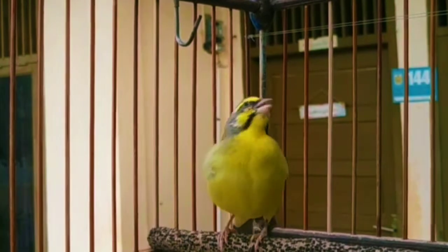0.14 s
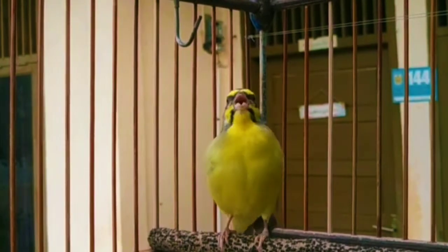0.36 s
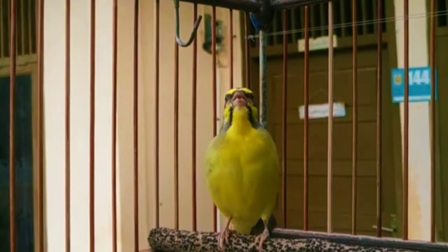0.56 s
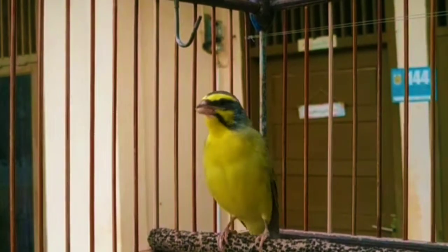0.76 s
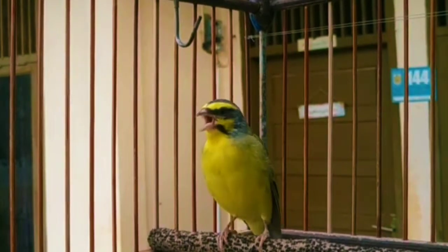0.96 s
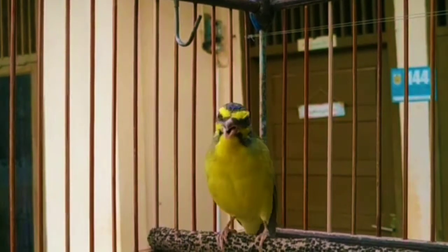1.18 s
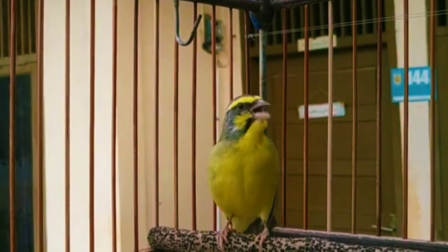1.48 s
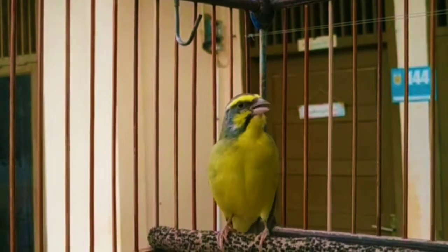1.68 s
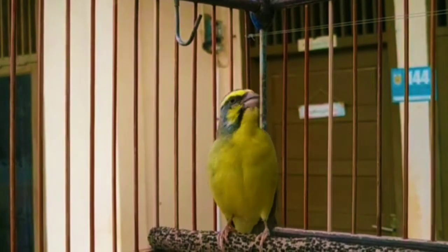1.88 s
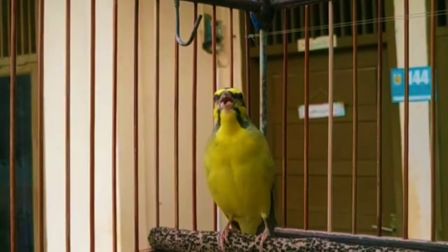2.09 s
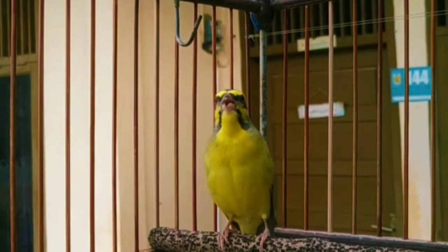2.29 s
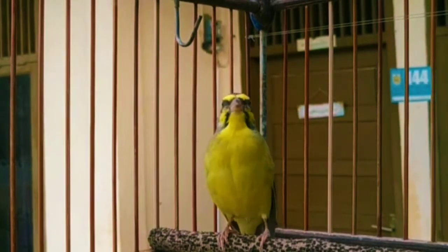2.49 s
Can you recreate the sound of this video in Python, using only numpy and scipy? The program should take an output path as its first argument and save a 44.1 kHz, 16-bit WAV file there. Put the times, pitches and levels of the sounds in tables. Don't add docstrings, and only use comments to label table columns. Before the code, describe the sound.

A caged canary sings a loud, fast burst of sweeping whistles ending in an even trill

```python
import sys
import numpy as np
from scipy import signal
from scipy.fft import rfft, irfft, next_fast_len
from scipy.io import wavfile
from scipy.ndimage import uniform_filter1d

SR = 44100
rng = np.random.default_rng(int(sys.argv[2]) if len(sys.argv) > 2 else 0)


def volts_from_decibels(level):
    exponent = np.asarray(level, float) / 20
    return 10 ** exponent


def generate_wav(signal):
    frames = np.transpose(np.atleast_2d(signal))
    scaled = np.clip(frames, -1, 1) * 32767
    pcm = np.round(scaled).astype(np.int16)
    wavfile.write(sys.argv[1], SR, pcm)


N = 116865


def at_hz(points, hz):
    table_hz, values = np.transpose(points)
    return np.interp(np.log(hz), np.log(table_hz), values)


def drift(rate_hz):
    r = np.exp(-2 * np.pi * rate_hz / SR)
    slow = signal.lfilter([1], [1, -2 * r, r * r], rng.standard_normal(N + SR))[SR:]
    return slow / slow.std()


def bandpass(x, low_hz, high_hz):
    return signal.sosfilt(signal.butter(2, [low_hz, high_hz], "band", fs=SR, output="sos"), x)


# frequency in Hz, density in dB per Hz.
STREET_SPECTRUM = [(70, -15.5), (200, -2.5), (380, -3.5), (1080, -12.5), (2580, -11.5), (5300, -21),
                   (10500, -13.5), (15500, -26)]
# frequency in Hz, left-right likeness from -1 to 1.
PORT_LIKENESS = [(60, 0.17), (200, 0.89), (1200, 0.035), (8000, 0.062)]
# frequency in Hz, peak level in dB.
STEADY_TONES = [(700, -64), (5795, -57), (7730, -61)]
STREET_DB, RUMBLE_CUT_HZ = -43.5, 77


def street():
    hum = 0
    edges = 30 * 2 ** np.arange(0, 9.6, .5)
    white = rng.standard_normal((2, 2, N))
    for k, (low, high) in enumerate(zip(edges, edges[1:])):
        mid, side = bandpass(white[k % 2], low, high)
        hz = np.sqrt(low * high)
        alike = np.clip(at_hz(PORT_LIKENESS, hz), -1, 1)
        ports = np.sqrt(1 + alike) * mid + np.sqrt(1 - alike) * side * [[1], [-1]]
        hum = hum + volts_from_decibels(at_hz(STREET_SPECTRUM, hz) + 1.5 * drift(3)) * ports
    hum = signal.sosfilt(signal.butter(2, RUMBLE_CUT_HZ, "high", fs=SR, output="sos"), hum)
    t = np.arange(N) / SR
    tones = 0
    for hz, db in STEADY_TONES:
        tones = tones + volts_from_decibels(db + 3.5 * drift(18)) * np.sin(2 * np.pi * (hz * t + rng.random()))
    return volts_from_decibels(STREET_DB) * hum / hum.mean(axis=0).std() + tones


def glide(s, values, t):
    step = np.diff(s)
    slope = np.diff(values) / step
    a, b = slope[:-1], slope[1:]
    inner = np.where(a * b > 0, 2 * a * b / (a + b + 1e-9), 0)
    m = np.r_[slope[0], inner, slope[-1]]
    k = np.clip(np.searchsorted(s, t) - 1, 0, len(step) - 1)
    u = (t - s[k]) / step[k]
    square = 3 * slope[k] - 2 * m[k] - m[k + 1]
    cube = m[k] + m[k + 1] - 2 * slope[k]
    return values[k] + step[k] * u * (m[k] + u * square + u * u * cube)


def fade(t, rise_s, fall_s):
    nearest_edge = np.minimum((t - t[0]) / rise_s, (t[-1] - t) / fall_s)
    return np.sin(np.pi / 2 * np.clip(nearest_edge, 0, 1)) ** 2


def syrinx_side(out, start_s, hz, gain, wobble):
    i = int(start_s * SR)
    span = slice(i, i + len(hz))
    phase = 2 * np.pi * (np.cumsum(hz + wobble[span]) / SR + rng.random())
    octave = volts_from_decibels(-37 + 9 * np.clip(4 - hz / 1000, 0, 2)) * np.sin(2 * phase)
    twelfth = volts_from_decibels(-32) * np.sin(3 * phase)
    out[span] += gain * (np.sin(phase) + octave + twelfth)


EDGE_S = .004
# time in seconds, pitch in Hz, level in dB.
LOW_WARBLE = [
    [(.192, 5400, -44), (.196, 5600, -27), (.2075, 3050, -17.5), (.227, 6050, -9), (.253, 3570, -11),
     (.262, 4500, -10), (.272, 5500, -25)],
    [(.326, 4500, -21), (.3365, 5950, -14.5), (.346, 3150, -30), (.356, 5450, -3.5), (.365, 6150, -8.5),
     (.389, 3600, -24.5), (.405, 5500, -13)],
    [(.438, 4450, -14), (.443, 4700, -10.5), (.45, 3700, -26), (.459, 2950, -11), (.475, 4400, -8.5),
     (.494, 3300, -7.5), (.5, 3000, -58)],
    [(.54, 4300, -23.5), (.557, 3350, -18.5), (.573, 5050, -19), (.585, 4300, -20)],
    [(.574, 4600, -18.5), (.603, 2800, -15.5), (.6195, 4150, -8), (.636, 3200, -5.5), (.668, 2300, -27.5)],
    [(.723, 4800, -19.5), (.727, 4850, -18.5), (.736, 3100, -25.5), (.745, 1950, -43.5),
     (.754, 2800, -27.5), (.761, 3650, -10), (.768, 4600, -9), (.787, 3350, -5), (.816, 2350, -27)],
]
# time in seconds, pitch in Hz, level in dB.
HIGH_WARBLE = [
    [(.842, 6130, -48), (.849, 7400, -19), (.8585, 3538, -18), (.869, 6400, -6.5), (.88, 6960, -11),
     (.899, 6287, -1), (.91, 6330, -8), (.92, 6360, -10), (.937, 4425, -6.5), (.952, 5940, -23)],
    [(.862, 3780, -36), (.87, 5200, -31), (.882, 6164, -24.5), (.892, 6070, -11), (.906, 5420, -16.5),
     (.914, 5850, -9)],
    [(.986, 6550, -31), (.99, 6850, -12.5), (.9965, 4467, -15.5), (1.006, 6500, -8), (1.016, 6760, -8.5),
     (1.031, 6150, -5.5), (1.045, 4150, -24), (1.059, 5870, -2)],
    [(1.04, 7824, -22), (1.049, 6760, -17), (1.065, 6350, -9.5), (1.084, 4320, -10), (1.092, 5260, -7.5),
     (1.1, 5700, -49)],
    [(1.134, 7280, -15), (1.1455, 4493, -8.5), (1.155, 6500, -8), (1.164, 6670, -8.5), (1.182, 5960, -9.5),
     (1.199, 3640, -25), (1.213, 5460, -7)],
]
# time in seconds, pitch in Hz, level in dB.
LONG_SWEEPS = [
    [(1.188, 7040, -18.5), (1.213, 5794, -8), (1.238, 3513, -16.5), (1.256, 5060, -13), (1.276, 5480, -7.5),
     (1.291, 5100, -9), (1.306, 4330, -6), (1.318, 4087, -8), (1.331, 4200, -26)],
    [(1.384, 6220, -43), (1.389, 7100, -9), (1.398, 3556, -21), (1.409, 6430, -7), (1.42, 6820, -10.5),
     (1.429, 7170, -8)],
    [(1.432, 7380, -28.5), (1.438, 7950, -15.5), (1.449, 4800, -11.5), (1.462, 6620, -6.5),
     (1.475, 6830, -8.5), (1.494, 6235, -9), (1.514, 4473, -7.5), (1.528, 5760, -7.5), (1.541, 6150, -13)],
    [(1.549, 5710, -9), (1.565, 4440, -6.5), (1.572, 4227, -14.5), (1.581, 4500, -29)],
]
# time in seconds, pitch in Hz, level in dB.
TRILL_APPROACH = [
    [(1.62, 5100, -17), (1.634, 4080, -16.5), (1.6485, 5500, -8.5), (1.675, 3512, -12), (1.684, 4300, -8),
     (1.693, 5400, -9.5), (1.708, 4400, -4.5), (1.72, 3910, -23), (1.726, 4220, -26)],
    [(1.768, 4800, -25.5), (1.79, 2940, -8.5), (1.8035, 4430, -11), (1.82, 3216, -6.5),
     (1.829, 2570, -23.5), (1.834, 1900, -32.5)],
    [(1.839, 1887, -40), (1.844, 2437, -18), (1.852, 3046, -7), (1.87, 3710, -4), (1.89, 3846, -1.5),
     (1.903, 3874, -10), (1.91, 3890, -16)],
]
# time in seconds,
# pitch in Hz, level in dB.
SHORT_WHISTLES = [
    [(.263, 3590, -24), (.272, 3760, -14)],
    [(.342, 7650, -28), (.346, 6430, -14), (.35, 7900, -24)],
    [(.379, 6410, -13), (.39, 5950, -15), (.402, 5350, -13)],
    [(.445, 4530, -29), (.451, 4050, -18)],
    [(.496, 5160, -20), (.501, 3900, -14), (.507, 3250, -12)],
    [(.542, 4380, -21), (.548, 4570, -10), (.554, 4450, -21.5)],
    [(.741, 4300, -40), (.748, 4140, -32)],
    [(.756, 3900, -25.5), (.762, 4400, -18.5), (.767, 4730, -13)],
    [(.856, 7600, -34), (.859, 7100, -23), (.862, 7400, -34)],
    [(.941, 4210, -30), (.953, 4620, -22)],
    [(1.024, 6340, -22), (1.033, 7440, -35.5)],
    [(1.091, 4080, -27.5), (1.1, 4360, -21)],
    [(1.163, 6740, -16), (1.175, 6900, -15.5), (1.185, 7300, -23)],
    [(1.25, 4000, -25), (1.257, 3700, -17)],
    [(1.396, 7400, -27), (1.401, 7500, -25)],
    [(1.421, 6540, -29), (1.431, 6140, -10), (1.438, 5480, -5.5)],
    [(1.528, 5120, -34), (1.537, 4400, -19), (1.545, 4050, -30)],
    [(1.689, 4080, -13.5), (1.697, 3590, -12)],
    [(1.826, 3740, -24), (1.834, 2870, -30)],
]


def warble(out, wobble):
    sweeps = LONG_SWEEPS[:2] + [LONG_SWEEPS[2] + LONG_SWEEPS[3]]
    for note in LOW_WARBLE + HIGH_WARBLE + sweeps + TRILL_APPROACH + SHORT_WHISTLES:
        s, hz, db = np.transpose(sorted(note))
        t = np.arange(s[0] - EDGE_S / 2, s[-1] + EDGE_S / 2, 1 / SR)
        gain = volts_from_decibels(glide(s, db, np.clip(t, s[0], s[-1]))) * fade(t, EDGE_S, EDGE_S)
        syrinx_side(out, t[0], glide(s, hz, t), gain, wobble)


# start in seconds, length in seconds, held pitch in Hz, level in dB.
TRILL_NOTES = [
    (1.946, .038, 3988, -3.5),
    (2.0063, 0.041, 3996, -5),
    (2.067, .041, 4047, -4),
    (2.132, .041, 4010, -5),
    (2.1956, 0.042, 4030, -5.5),
    (2.263, .043, 3990, -5),
    (2.332, 0.045, 3952, -5),
]
TRILL_FROM_HZ, TRILL_RISE_S, TRILL_BEND = 1300, 0.0082, 1.35
TRILL_START_DB, TRILL_SWELL_S, TRILL_FADE_S = -40, 0.011, 0.011


def trill(out, wobble):
    for start, length, held_hz, db in TRILL_NOTES:
        t = np.arange(0, length, 1 / SR)
        hz = held_hz - (held_hz - TRILL_FROM_HZ) * np.exp(-(t / TRILL_RISE_S) ** TRILL_BEND)
        swell_db = TRILL_START_DB * np.clip(1 - t / TRILL_SWELL_S, 0, 1)
        syrinx_side(out, start, hz, volts_from_decibels(db + swell_db) * fade(t, EDGE_S, TRILL_FADE_S), wobble)


def canary():
    song = np.zeros(N)
    wobble = 8 * drift(250)
    warble(song, wobble)
    trill(song, wobble)
    return song * volts_from_decibels(.7 * drift(180))


# delay in seconds, strength.
LEFT_PATHS = [
    (0, 1),
    (.001174, .42),
    (.000621, -.2),
]
# delay in seconds, strength.
RIGHT_PATHS = [
    (-.000016, 1),
    (.001205, .42),
    (.000671, .3),
]
DIRECT_DB, PORCH_DB = 3.5, -10
PORCH_T60_S, PORCH_GAP_S = 0.37, .007
PORCH_KNEE_HZ, PORCH_SLOPE = 3900, 1.1


def porch(x):
    size = next_fast_len(N + SR)
    hz = np.fft.rfftfreq(size, 1 / SR)
    t = np.arange(SR) / SR
    tail = rng.standard_normal((2, SR)) * volts_from_decibels(-60 * t / PORCH_T60_S)
    tail *= np.clip(t / PORCH_GAP_S - 1, 0, 1)
    tail *= volts_from_decibels(PORCH_DB) / np.sqrt(np.sum(tail ** 2, axis=1)[:, None])
    near = np.array([sum(g * np.exp(-2j * np.pi * hz * s) for s, g in paths)
                     for paths in (LEFT_PATHS, RIGHT_PATHS)])
    tail_colour = np.minimum(hz / PORCH_KNEE_HZ, 1) ** PORCH_SLOPE
    answer = volts_from_decibels(DIRECT_DB) * near + rfft(tail, size) * tail_colour
    return irfft(rfft(x, size) * answer, size)[:, :N]


def low_thumps(x):
    return x + volts_from_decibels(-23.5) * bandpass(x ** 2 * rng.standard_normal(x.shape), 25, 110)


def overload(x):
    ceiling, hardness = 0.96, 15
    return x / (1 + np.abs(x / ceiling) ** hardness) ** (1 / hardness)


BAND_HZ, KEEP_DB, CUTOFF_HZ = 430, -49, 15680
FIZZ_DB, FIZZ_PATCH_DB, FIZZ_TILT_DB, FIZZ_PITCH_POWER, BELOW_DB = -31, 7.5, 3.5, 4.5, -13
HOLES_FROM_HZ, HOLE_SHARE, HOLE_UNDER_DB, HOLE_DEPTH = 2000, .45, -15, .02
GRAIN_DB = 5.5


def noisy_bands(x):
    frame = dict(fs=SR, window="cosine", nperseg=2048)
    hz, _, z = signal.stft(x, **frame)
    band = np.maximum(hz // BAND_HZ - 1, 0).astype(int)
    member = (band == np.unique(band)[:, None]).astype(float)
    number = np.arange(len(member))[:, None]
    upper = number > 0
    mean = member / member.sum(axis=1, keepdims=True) @ np.abs(z) ** 2 + 1e-18
    top = mean.max(axis=1, keepdims=True)
    strongest = mean.argmax(axis=1)[:, None]
    clear = np.where(upper, np.clip((10 * np.log10(mean / top) - KEEP_DB) / 2, 0, 1), 1)
    luck = uniform_filter1d(rng.standard_normal((2,) + mean.shape[1:]), size=2)

    pitch = (strongest + 1.5) * BAND_HZ / 5500
    swept = (mean.sum(axis=1, keepdims=True) - top) ** 2 / top * pitch ** FIZZ_PITCH_POWER
    tilt = np.linspace(-1, 1, len(member))[:, None]
    patches = volts_from_decibels(FIZZ_DB + FIZZ_PATCH_DB * luck[0] + FIZZ_TILT_DB * tilt) ** 2
    fizz = upper * np.where(number < strongest, volts_from_decibels(BELOW_DB), 1) * swept * patches

    faint = mean.max(axis=0) < top.max(axis=0) * volts_from_decibels(KEEP_DB + HOLE_UNDER_DB)
    weak = (number > HOLES_FROM_HZ / BAND_HZ) & faint
    kept = np.where((luck[1] < np.quantile(luck[1], HOLE_SHARE)) & weak, HOLE_DEPTH, 1)

    power = np.mean(x ** 2, axis=0) + 1e-5
    pulse = np.sqrt(uniform_filter1d(power, size=300) / uniform_filter1d(power, size=2048))
    noise = signal.stft(rng.standard_normal(x.shape) * pulse, **frame)[2]
    noise *= volts_from_decibels(GRAIN_DB * rng.standard_normal(noise.shape))
    noise *= np.sqrt(member.T @ ((1 - clear) * mean + fizz) / np.mean(np.abs(noise) ** 2))
    z = (member.T @ kept) * (np.sqrt(member.T @ clear) * z + noise) * (hz < CUTOFF_HZ)[:, None]
    return signal.istft(z, **frame)[1][:, :N]


def scene():
    return porch(canary()) + street()


def band_limit(x):
    return signal.sosfilt(signal.butter(12, 15680, fs=SR, output="sos"), x)


def record(dry):
    mix = noisy_bands(overload(low_thumps(dry)))
    return band_limit(np.clip(mix, -1, 1))


dry = scene()
out = record(dry)
generate_wav(out)
```